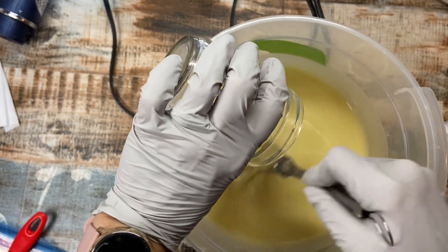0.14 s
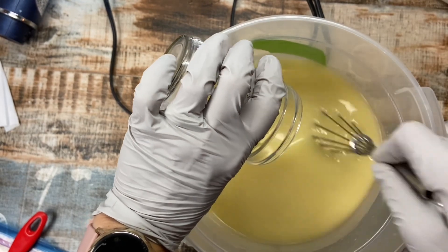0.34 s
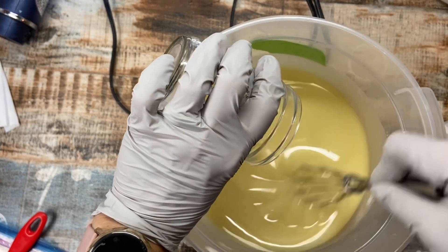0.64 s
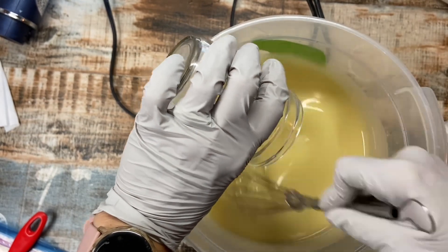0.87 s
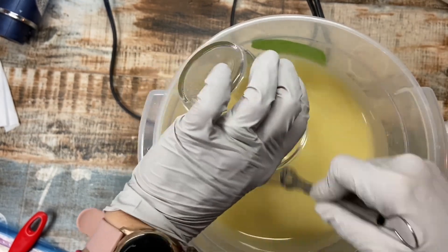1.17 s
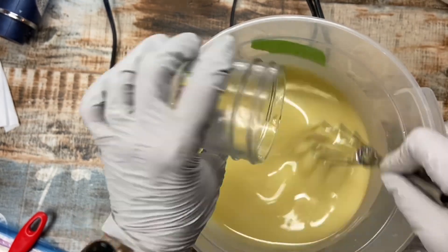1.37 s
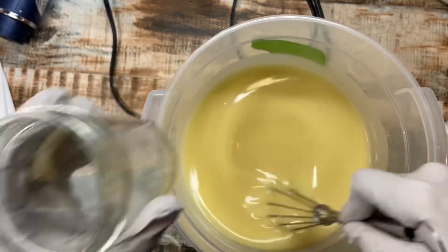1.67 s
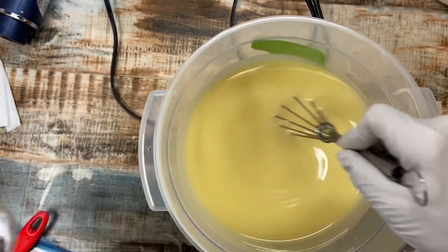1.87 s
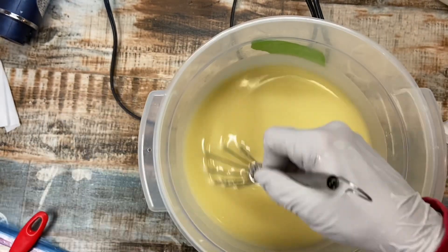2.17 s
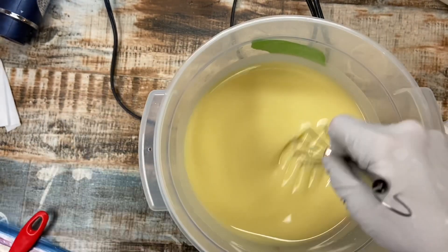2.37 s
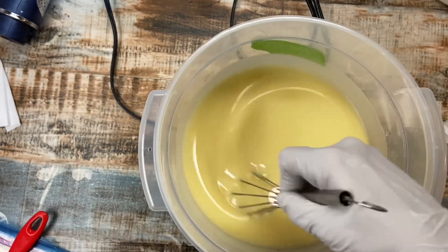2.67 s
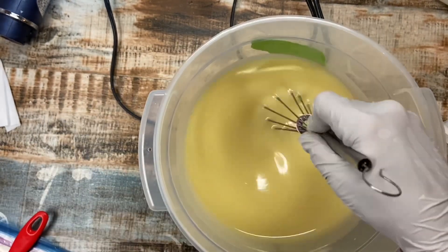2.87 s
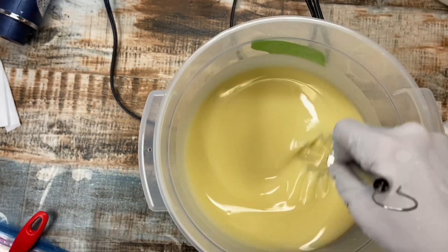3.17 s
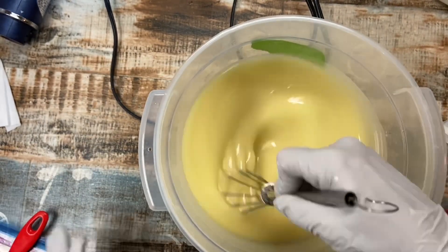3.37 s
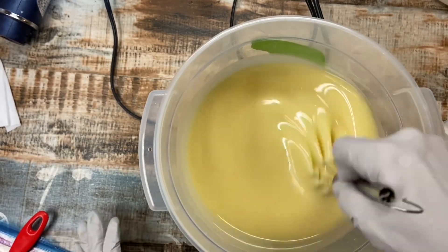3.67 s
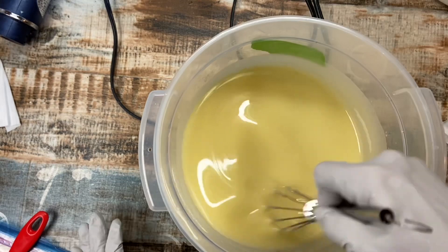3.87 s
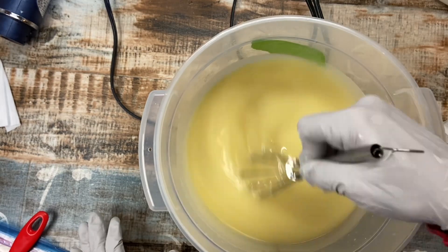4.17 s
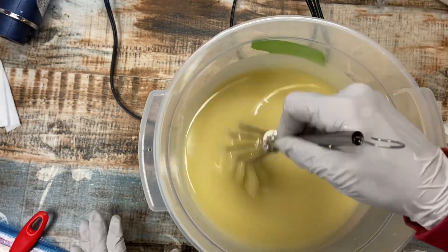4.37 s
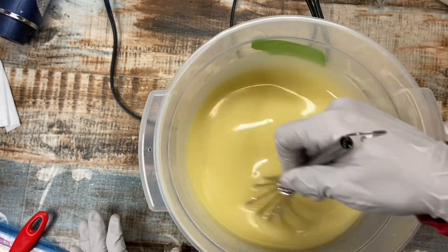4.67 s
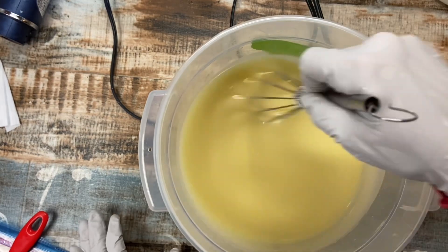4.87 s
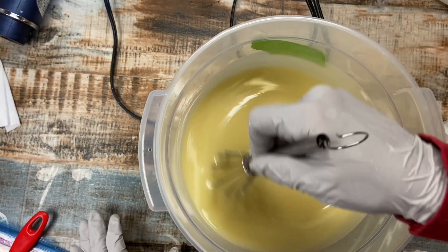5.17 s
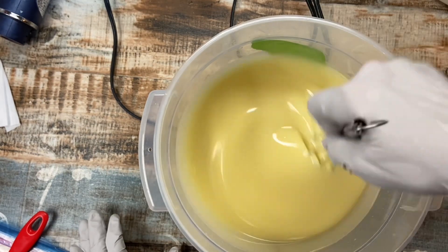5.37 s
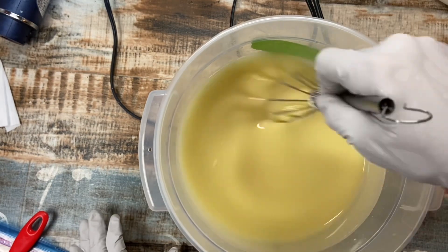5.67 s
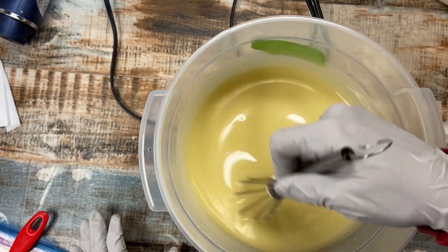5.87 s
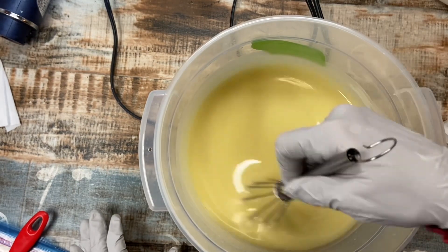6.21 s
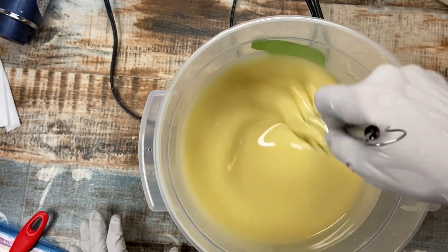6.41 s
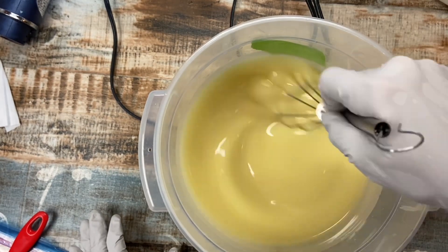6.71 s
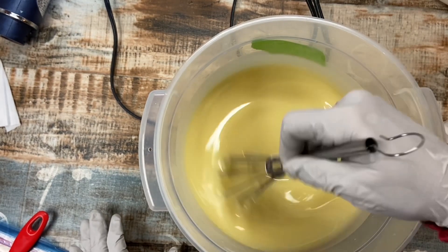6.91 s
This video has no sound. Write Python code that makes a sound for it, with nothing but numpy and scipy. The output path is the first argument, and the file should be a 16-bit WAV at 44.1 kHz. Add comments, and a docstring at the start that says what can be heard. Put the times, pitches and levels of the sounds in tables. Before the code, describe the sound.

A wire whisk taps and scrapes quickly around a plastic bowl of batter; midway a glass jar clinks and knocks hard onto wood.

```python
"""A wire whisk stirs batter in a plastic bowl on a wooden table: taps ring damped bowl modes, wires tick as
short bright noise, drags excite the bowl's resonances at random and pushes swell in low table modes.
A glass jar is set down: it clinks on another glass thing in wavering modes and knocks the board into modal ringing.
A ventilated room gives shaped noise, a hum and a whistle.
Two microphone ports hear it all, with likeness, level and phase that vary with frequency."""
import sys
import numpy as np
from scipy import signal
from scipy.fft import rfft, irfft, next_fast_len
from scipy.io import wavfile

SR = 44100
rng = np.random.default_rng(int(sys.argv[2]) if len(sys.argv) > 2 else 0)


def int16_out(signal):
    """Quantize to a 16-bit WAV file."""
    q = np.round(np.clip(np.atleast_2d(signal).T, -1, 1) * 32767)
    wavfile.write(sys.argv[1], SR, q.astype(np.int16))


N = 310680

# low resonances of the bowl: [f/Hz, relative level/dB, t60/s]
BELLY_MODES = [(308, -0.5, 0.025), (495, 10.5, 0.021), (666, -3.5, 0.048), (793, 5, 0.017)]
# resonances of the bowl wall: [f/Hz, relative level/dB, t60/s]
WALL_MODES = [(864, 4.5, 0.015), (1040, -14, 0.024), (1173, -1.5, 0.045), (1281, -0.5, 0.032),
              (1442, -2.5, 0.032), (1610, -14, 0.016), (1727, 0, 0.022), (1963, 0, 0.024), (2090, 1, 0.028),
              (2260, -5, 0.043), (2480, -4.5, 0.026), (2810, -4.5, 0.021)]


def amp(db):
    """Decibel law: level/dB to amplitude ratio."""
    return 10 ** (np.asarray(db) / 20)


def unit(x):
    """Power normalisation: scale to rms 1."""
    return x / np.sqrt(np.mean(x ** 2) + 1e-20)


def along(points, hz):
    """Logarithmic frequency scale: interpolate (f/Hz, value) points along it."""
    f, v = np.transpose(points)
    return np.interp(np.log(hz + 1), np.log(f + 1), v)


def curve(rows):
    """Slow modulation: interpolate (t/s, value) rows to one value per sample."""
    return np.interp(np.arange(N) / SR, *np.transpose(rows))


def filtered(x, response):
    """Linear filtering: multiply the spectrum of x by a complex response of frequency."""
    m = next_fast_len(N + SR // 2)
    return irfft(rfft(x, m) * response(np.fft.rfftfreq(m, 1 / SR)), m)[..., :N]


def coloured(points):
    """Spectral shaping: noise of rms 1 that follows (f/Hz, relative level/dB) points."""
    return unit(filtered(rng.standard_normal(N), lambda hz: amp(along(points, hz))))


def ring(modes, spread_db, attack, size):
    """Modal superposition: damped sines at fresh strengths and slightly fresh pitches, peak 1."""
    t = np.arange(size) / SR
    hz, db, t60 = np.transpose(modes)[:, :, None]
    luck = rng.standard_normal((2, len(modes), 1))
    decay = amp(db + spread_db * luck[0] - 60 * t / t60)
    tones = np.sin(2 * np.pi * hz * (1 + 0.024 * luck[1]) * t)
    x = np.sum(decay * tones, axis=0) * (1 - np.exp(-t / attack))
    return x / np.abs(x).max()


def add(track, s, x):
    """Linear superposition: mix x into track at s seconds."""
    part = track[round(s * SR):][:len(x)]
    part += x[:len(part)]


def puff(t60, size):
    """Exponential decay: a sharp envelope that falls 60 dB in t60 seconds."""
    return amp(-60 * np.arange(size) / SR / t60)


def air():
    """Broadband turbulence: two independent noises, with a narrow wavering hum and a faint unsteady whistle."""
    # spectrum of the room air: [f/Hz, relative level/dB]
    air_colour = [(24, -24), (31, -34), (41, -50), (50, -18), (60, -2), (80, -2), (140, -3), (200, -11),
                  (340, -11.5), (520, -8.5), (640, -16.5), (1100, -24), (2850, -28), (3200, -28),
                  (8000, -34), (16000, -48.5)]
    whistle = unit(filtered(rng.standard_normal(N), lambda f: 1 / (1 + ((f - 2850) / 60) ** 2)))
    hum = unit(filtered(rng.standard_normal(N), lambda f: 1 / (1 + ((f - 58) / 5) ** 2)))
    tonal = amp(-39.0) * hum + amp(-56.5) * whistle
    hiss = np.array([coloured(air_colour), coloured(air_colour)])
    return amp(-34.5) * hiss + tonal * [[1], [0]]  # the tonal part is common to both ports


def soft(hz, edge_hz):
    """Contact low-pass: a blunt contact gives little above its edge."""
    return 1 / (1 + 1j * hz / edge_hz) ** 2


def resonances(modes, width_hz):
    """Parallel resonators: the response of a bowl part to soft rubbing, every mode equally wide."""
    def response(f):
        bands = sum(amp(db) * 1j * f * width_hz / (centre * centre - f * f + 1j * f * width_hz)
                    for centre, db, _ in modes)
        return soft(f, 4800) * bands
    return response


def scrape():
    """Frictional excitation: wires slip along the bottom in soft random rubs that drive the bowl's modes."""
    # strength of the dragging before the part levels: [t/s, level/dB]
    drag_level = [(0.0, -50), (0.61, -47.5), (1.12, -48.5), (1.41, -45), (1.86, -56), (2.21, -46),
                  (2.55, -47.5), (3.22, -47.5), (3.41, -49), (3.71, -49.5), (4.29, -49.5), (4.65, -48),
                  (5.23, -47), (5.51, -47.5), (6.04, -47.5), (6.2, -47.5), (7.04, -50.5)]
    slips_per_s = 110
    slips = (rng.random(N) < slips_per_s / SR) * amp(2.5 * rng.standard_normal(N))
    rub_shape = puff(0.09, size=4096) - puff(0.018, size=4096)  # rises, then dies away
    rubs = signal.fftconvolve(slips, rub_shape)[:N] * rng.standard_normal(N)
    wall = unit(filtered(rubs, resonances(WALL_MODES, 220)))
    belly = unit(filtered(rubs, resonances(BELLY_MODES, 85)))
    return amp(curve(drag_level)) * (amp(-5.0) * wall + amp(2.5) * belly)


def taps():
    """Impact excitation: each tap rings modes of the wall and belly of the bowl and cracks briefly."""
    # whisk on the wall: [t/s, wall peak level/dB, favoured f/Hz, crack level re wall peak/dB]
    tap_list = [(0.217, -20, 1110, -7.5), (0.3511, -29.5, 1070, -8.5), (0.393, -32, 1200, -7),
                (0.4353, -29.5, 2000, -14), (0.453, -30, 2300, -9), (0.5109, -27.5, 2200, -16),
                (0.558, -40, 2000, -18), (0.6632, -19.5, 1970, -8.5), (0.7115, -28, 1730, -7.5),
                (0.74, -32, 2150, -11), (0.8411, -25.5, 1960, -9.5), (1.0072, -22, 2000, -11.5),
                (1.1894, -22.5, 2000, -16.5), (1.3006, -11, 1900, -21), (1.303, -15.5, 1180, -30),
                (1.3508, -25, 2040, -12), (1.484, -28.5, 2030, -14), (1.5, -26.5, 2090, -10),
                (1.5648, -29, 2040, -25), (1.7663, -28.5, 1190, -13), (1.7854, -27.5, 2080, -13),
                (1.9145, -15.5, 2150, -15), (2.374, -19, 2040, -8.5), (2.792, -16.5, 1580, -10),
                (2.9527, -20, 1220, -17), (2.962, -22.5, 1900, -15), (2.9704, -19, 1860, -14),
                (3.1682, -21, 1340, -13), (3.1823, -25, 1880, -10), (3.331, -15, 2010, -15),
                (3.341, -19, 1140, -18), (3.5359, -29.5, 1350, -9), (3.705, -32.5, 1460, -6),
                (3.8726, -36.5, 2390, -3), (4.0509, -33.5, 1150, -5.5), (4.1738, -30, 2300, -7),
                (4.1768, -22, 1440, -15), (4.198, -37, 2300, -18), (4.3943, -25.5, 1460, -17),
                (4.4753, -30, 1250, -15), (4.5815, -23.5, 1950, -12), (4.669, -32.5, 1190, -20),
                (4.7338, -30.5, 1200, -18), (4.7963, -34, 2190, -15), (4.9501, -31, 1200, -16),
                (4.9909, -25.5, 1220, -14), (5.011, -29, 2100, -20), (5.026, -30, 1470, -7),
                (5.0961, -27.5, 1480, -17), (5.2124, -32, 2070, -19), (5.3467, -23, 1300, -16),
                (5.3701, -26, 2080, -12), (5.388, -26, 2080, -13), (5.4677, -30, 1430, -17),
                (5.5451, -32, 2220, -20), (5.7134, -28, 1280, -10), (5.7379, -23.5, 1240, -18),
                (5.758, -25.5, 1980, -10), (5.8326, -29, 1220, -27), (5.946, -35, 2060, -23),
                (5.9813, -34, 1510, -17), (6.0674, -22.5, 2750, -6), (6.098, -33, 1930, -13),
                (6.1115, -29, 2010, -12), (6.1678, -24.5, 1250, -17), (6.2774, -26.5, 2100, -13),
                (6.4023, -28, 1290, -13), (6.4278, -28, 1490, -10), (6.4891, -24, 1490, -15),
                (6.5989, -27.5, 2100, -11.5), (6.629, -27.5, 1500, -15), (6.7435, -25, 1330, -5.5),
                (6.7606, -30, 2070, -22), (6.774, -25, 2000, -8.5), (6.8244, -20.5, 1570, -16.5),
                (6.948, -21, 2250, -6.5), (7.018, -29.5, 1540, 1)]
    # extra low bowl ringing under three taps: [t/s, peak level/dB]
    extra_belly = [(1.306, -30), (1.356, -28), (4.178, -18.5)]
    # crack spectrum: [f/Hz, relative level/dB]
    crack_colour = [(2500, -1.5), (3500, -5), (6000, -4.5), (9000, -14.5), (15000, -18)]
    middling_db = -25  # reference tap
    belly_db, belly_growth, belly_lag_s = -28, 0.97, 0.00508  # at the reference; dB per dB of tap; delay
    focus_db_per_octave, focus_widens = 4.5, 0.26  # loss off the favoured pitch; less per dB of a firmer tap
    spot_db, spot_octaves = 6.5, 0.088  # lift right at the favoured pitch, and its reach
    chatter_t60_s, chatter_per_s, chatter_db = 0.021, 600, -6  # more wires land after the first
    chatter_shrinks = 0.15  # dB less chatter per dB of a firmer tap
    bowl, crack = np.zeros(N), np.zeros(N)
    for s, db, hz, edge_db in tap_list:
        firmness_db = db - middling_db
        # the spot that is struck favours some modes
        octaves = np.abs(np.log2(np.array(WALL_MODES)[:, 0] / hz))
        lift_db = spot_db * np.exp(-(octaves / spot_octaves) ** 2)
        loss_db = (focus_db_per_octave - focus_widens * firmness_db) * octaves - lift_db
        wall = np.array(WALL_MODES) - np.outer(loss_db, [0, 1, 0])
        landings = (rng.random(1600) < chatter_per_s / SR) * rng.standard_normal(1600)
        chatter_gain = amp(chatter_db - chatter_shrinks * firmness_db)
        chatter = chatter_gain * puff(chatter_t60_s, size=1600) * landings
        chatter[0] = 1  # the first contact
        rung = signal.fftconvolve(ring(wall, 2.9, 0.00062, size=4096), chatter)
        add(bowl, s, amp(db) * rung / np.abs(rung).max())
        belly = ring(BELLY_MODES, 2.0, 0.0017, size=4096)
        add(bowl, s + belly_lag_s, amp(belly_db + belly_growth * firmness_db) * belly)
        add(crack, s, amp(db + edge_db) * puff(0.076, size=4096))
    for s, db in extra_belly:
        add(bowl, s, amp(db) * ring(BELLY_MODES, 3.2, 0.0027, size=4096))
    return bowl + crack * coloured(crack_colour)


def ticks():
    """Gated noise: steel wires spring together in short bright rattles that hold for a moment, then stop."""
    # wires against each other: [t/s, level at onset/dB]
    tick_list = [(0.218, -29.5), (0.5881, -41), (0.6635, -24.5), (0.7633, -22.5), (0.84, -42),
                 (1.0083, -32), (1.3498, -34.5), (1.9126, -31), (2.3738, -28), (2.792, -33),
                 (2.9716, -34.5), (3.168, -32.5), (3.339, -29.5), (3.708, -41), (4.174, -31.5),
                 (4.3929, -38), (4.583, -35), (5.3687, -40), (5.735, -36), (6.0643, -35), (6.1155, -37),
                 (6.777, -33), (6.9494, -34), (7.0179, -35)]
    # spectrum of the wires: [f/Hz, relative level/dB]
    wire_colour = [(2500, -10), (5500, -7.5), (7500, 8.5), (10500, -0.5), (13000, 1), (16000, 2.5)]
    rattle, t = np.zeros(N), np.arange(2048) / SR
    rattle_s = 0.0048  # time to fall to 1/e
    for s, db in tick_list:
        add(rattle, s, amp(db) * np.exp(-(t / rattle_s) ** 2))
    return rattle * coloured(wire_colour)


def thuds():
    """Modal selection: soft pushes swell in the table's low modes, most in the one nearest the favoured pitch."""
    # pushes into the table top: [t/s, peak level of the strongest mode/dB, favoured f/Hz]
    pushes = [(0.393, -33.5, 120), (0.462, -27.5, 170), (0.685, -28, 170), (0.851, -31, 60),
              (1.303, -17.5, 170), (1.36, -25, 170), (1.595, -33, 130), (1.803, -23.5, 180),
              (2.148, -28, 170), (2.345, -19, 100), (2.4, -11, 100), (2.5, -24.5, 120), (2.742, -23, 60),
              (2.807, -23, 170), (2.975, -19, 180), (3.152, -30.5, 130), (3.35, -20.5, 190),
              (4.05, -28, 120), (4.188, -25, 60), (4.194, -28, 180), (4.518, -25.5, 180),
              (4.603, -31.5, 120), (5.029, -21.5, 160), (5.385, -18, 170), (5.77, -21, 170),
              (5.881, -28, 50), (6.078, -19, 150), (6.123, -25.5, 180), (6.396, -27.5, 170),
              (6.75, -23, 150), (7.021, -22.5, 120)]
    # table resonances: [f/Hz, t60/s]
    table_modes = [(140.2, 0.099), (100, 0.14), (58.5, 0.36)]
    loss_db_per_octave = 15.5
    table, modes_hz = np.zeros(N), np.array(table_modes)[:, 0]
    for s, db, favoured_hz in pushes:
        loss_db = loss_db_per_octave * np.abs(np.log2(modes_hz / favoured_hz))
        for (hz, t60), down_db in zip(table_modes, loss_db - loss_db.min()):
            add(table, s, amp(db - down_db) * ring([(hz, 0, t60)], 0, 0.0074, size=SR // 3))
    return table


def knocks():
    """Repeated impact: the jar base knocks the board's modes with a leading blow and a dying rattle."""
    # base on wood: [t/s, peak level/dB, rattle t60/s, favoured f/Hz]
    knock_list = [(2.396, -16.5, 0.036, 450), (2.403, -18, 0.03, 400), (2.4992, -10.5, 0.024, 1200),
                  (2.5025, -2.5, 0.041, 860), (2.511, -10.5, 0.11, 1010), (2.558, -21.5, 0.05, 2300),
                  (2.626, -25, 0.14, 720), (2.664, -31, 0.05, 2800), (2.73, -25, 0.11, 890)]
    # board resonances: [f/Hz, relative level/dB, t60/s]
    board_modes = [(254, -7, 0.032), (400, -6.5, 0.071), (499, -2.5, 0.06), (617, -8, 0.023),
                   (673, 1.5, 0.034), (740, 0, 0.034), (852, -0.5, 0.022), (940, -3, 0.019),
                   (1190, -3.5, 0.028), (1305, -6, 0.03), (1705, -3.5, 0.022), (2470, -0.5, 0.017),
                   (3010, -1, 0.012), (3450, -2, 0.012), (4470, -13, .01)]
    loss_db_per_octave = 6.5  # away from the favoured pitch
    lead_fades = 0.7  # dB less of the leading blow over its rattle per dB of a softer knock
    wood = np.zeros(N)
    for s, db, t60, hz in knock_list:
        loss_db = loss_db_per_octave * np.abs(np.log2(np.array(board_modes)[:, 0] / hz))
        board = np.array(board_modes) - np.outer(loss_db, [0, 1, 0])
        rattle = 0.053 * puff(t60, size=8192) * rng.standard_normal(8192)
        rattle[0] = amp(lead_fades * db)
        knock = signal.fftconvolve(ring(board, 0.98, 0.0011, size=4096), rattle)
        add(wood, s, amp(db) * knock / np.abs(knock).max())
    return wood


def clinks():
    """Modal ringing with phase diffusion: glass rings unsteadily on its own modes amid a noisy clatter."""
    # jar contacts, before the ringing and clatter offsets: [t/s, level/dB]
    contacts = [(2.453, -10.5), (2.457, -19), (2.471, -19.5), (2.5, -21.5)]
    # jar resonances: [f/Hz, relative level/dB, t60/s]
    glass_modes = [(1723, -8, 0.09), (2422, 0, 0.12), (2462, -2, 0.08), (2567, -1, 0.09), (2720, -4, 0.077),
                   (2802, 2, 0.06), (2988, -4, 0.09), (3390, -3, 0.07), (3529, -4, 0.08), (3720, -9, 0.077),
                   (4204, -1, 0.07), (4402, -8, 0.1), (4565, -13, 0.08), (5022, -6, 0.075),
                   (5254, -9, 0.08), (5410, -11, 0.1), (6675, -17, 0.15), (7800, -13, 0.1),
                   (8110, -14, 0.09), (9350, -11, 0.09), (10430, -13, 0.2), (10828, -13, 0.17),
                   (12860, -15, 0.15)]
    # tones that swell out of the crash: [f/Hz, level before the swell/dB, t60/s, start t/s]
    swelling = [(1330, -41, 0.5, 2.53), (4170, -35, 0.9, 2.526), (5254, -42, 0.6, 2.525),
                (7786, -33, 2, 2.505)]
    # clatter spectrum: [f/Hz, relative level/dB]
    crash_colour = [(400, -1), (1000, 5.5), (2600, 1.5), (5000, -4), (10000, -16), (13000, -26),
                    (16000, -29)]
    swell_s = 0.0065  # rise time constant
    fade_start_s, fade_t60_s = 2.597, 0.13  # the swelling tones fade faster from this moment
    glass, clatter, t = np.zeros(N), np.zeros(N), np.arange(SR // 2) / SR

    def wavering(hz):
        """Phase diffusion: a sine whose phase wanders at random."""
        return np.sin(2 * np.pi * hz * t + np.cumsum(rng.normal(0, 0.0056, len(t))))

    for s, db in contacts:
        onset = 1 - puff(0.0033, size=len(t))
        rung = sum(amp(level + rng.normal(0, 1.4) - 60 * t / t60) * onset * wavering(hz)
                   for hz, level, t60 in glass_modes)
        add(glass, s, amp(db - 5.5) * rung)
        add(clatter, s, amp(db - 9.0) * puff(0.2, size=len(t)))
    for hz, db, t60, s in swelling:
        swell = amp(db - 60 * t / t60) * (1 - np.exp(-t / swell_s))
        faster_fade = amp(-60 * np.maximum(t + s - fade_start_s, 0) / fade_t60_s)
        add(glass, s, swell * faster_fade * wavering(hz))
    return glass + clatter * coloured(crash_colour)


def tail(decay, size):
    """Diffuse decay: noise of energy 1 in which each frequency dies at its own speed."""
    hz, t, z = signal.stft(rng.standard_normal(size), SR, nperseg=128)
    x = signal.istft(z * amp(-60 * t / along(decay, hz)[:, None]), SR, nperseg=128)[1]
    return x / np.linalg.norm(x)


def room(x):
    """Reverberation: convolve with a diffuse tail that decays at a rate set by frequency."""
    # reverberation time: [f/Hz, t60/s]
    room_decay = [(100, 0.41), (1000, 0.11), (10000, 0.08)]
    return amp(-11.0) * signal.fftconvolve(x, tail(room_decay, size=SR // 2))[:N]


def scatter(x, step):
    """Decorrelation by diffuse echoes: short random tails, drawn afresh each step and crossfaded."""
    out, fade = np.zeros(N), np.sqrt(np.hanning(2 * step))
    for start in range(0, N, step):
        piece = x[start:start + 2 * step]
        echoes = tail([(100, 0.0034), (10000, 0.016)], size=1024)  # (f/Hz, t60/s)
        add(out, start / SR, signal.fftconvolve(piece * fade[:len(piece)], echoes))
    return out


def scene():
    """Sum and difference coding: what both ports share and what differs, mixed by their likeness."""
    # likeness of the ports for equally strong parts: [f/Hz, correlation 0-1]
    likeness = [(60, .999), (170, 0.96), (450, 0.92), (800, 0), (2000, 0.95), (3100, 0), (5000, 0.97),
                (6000, 0.63), (7200, 1), (8000, 0.94), (8700, 0.45), (10000, 0.87), (11400, .99),
                (12100, 0.4), (13300, 1), (14200, 0.9), (15000, 0.6)]
    near = scrape() + taps() + ticks() + knocks() + clinks()
    near = near + room(near) + thuds()
    pair = [near, amp(0.5) * scatter(near, step=SR // 10)] + air()

    def weights(hz):
        """Power-preserving rotation: cosine for the shared part, sine for the differing part."""
        turn = np.arccos(np.clip(along(likeness, hz), 0, 1)) / 2
        return np.array([np.cos(turn), np.sin(turn)])

    same, other = filtered(pair, weights)
    return np.array([same + other, same - other])


def record(dry):
    """Interchannel phase and level: the ports differ in both by frequency; the top is dulled, then cut."""
    # left minus right: [f/Hz, level difference/dB]
    lean = [(60, -1), (130, -2), (290, -1), (640, -4.5), (1410, 1), (3100, -0.5), (6820, 1), (15000, 0.5)]
    # left ahead of right: [f/Hz, phase lead/half turns]
    lead = [(100, 0), (400, .05), (650, .25), (1500, 0), (2900, .2), (5400, .15), (6900, 1), (7900, 1),
            (9800, 2), (11500, 2), (12900, 3), (14300, 3), (15700, 4)]
    dull_hz, top_hz = 15900, 16800
    sides = np.array([[.5], [-.5]])  # each port takes half of the difference

    def port_response(hz):
        """Complex transfer: gain and phase of each port."""
        return amp(sides * along(lean, hz)) * np.exp(1j * np.pi * sides * along(lead, hz))

    ports = filtered(dry, port_response)
    dulled = filtered(ports, lambda hz: np.where(hz < dull_hz, 1, amp(-27)))
    return filtered(dulled, lambda hz: hz < top_hz)


dry = scene()
out = record(dry)
int16_out(out)
```